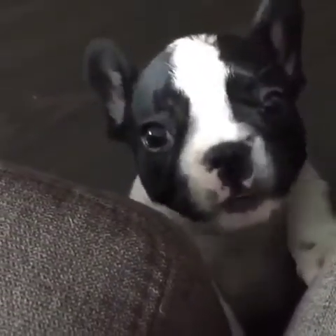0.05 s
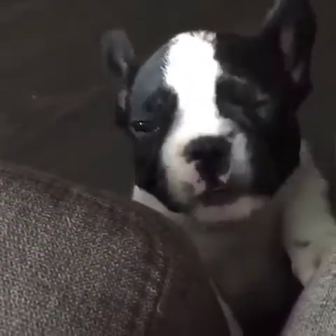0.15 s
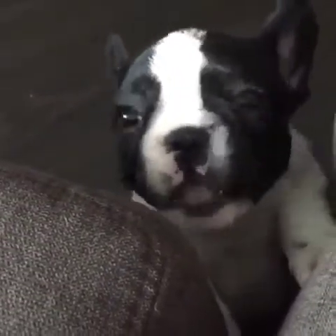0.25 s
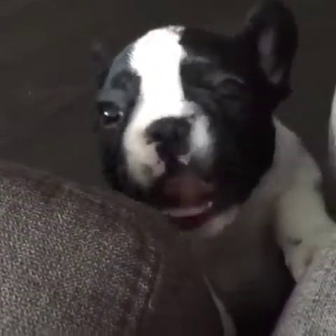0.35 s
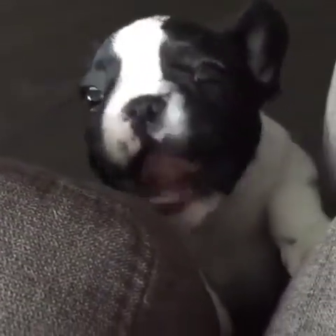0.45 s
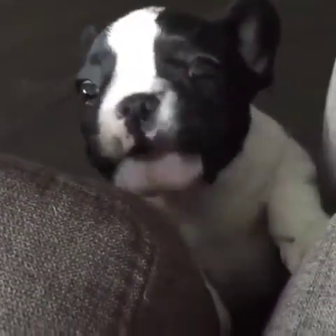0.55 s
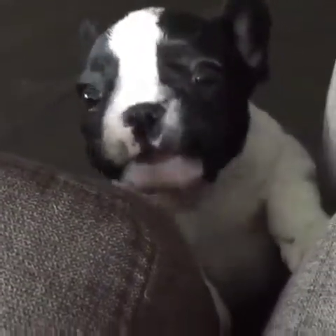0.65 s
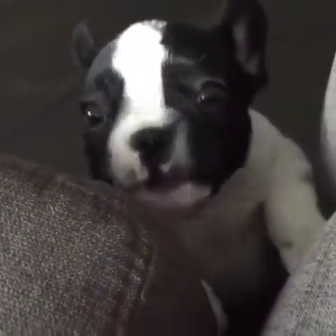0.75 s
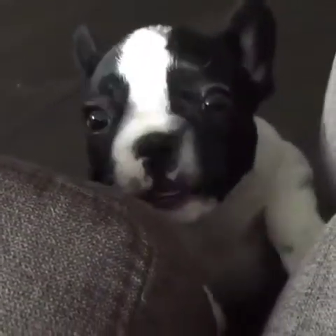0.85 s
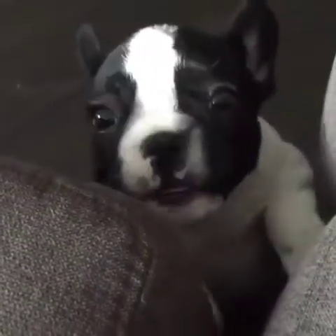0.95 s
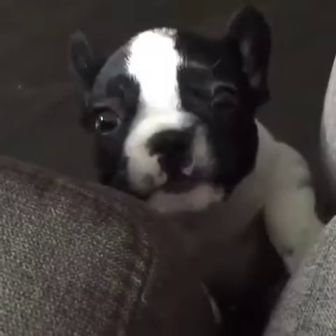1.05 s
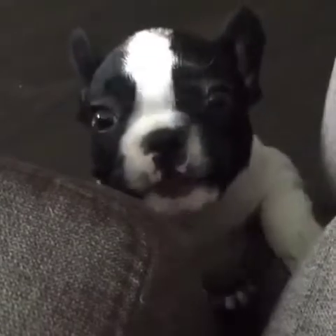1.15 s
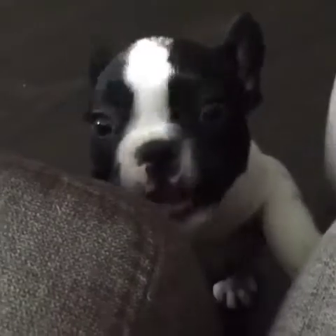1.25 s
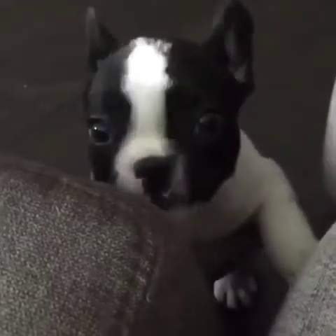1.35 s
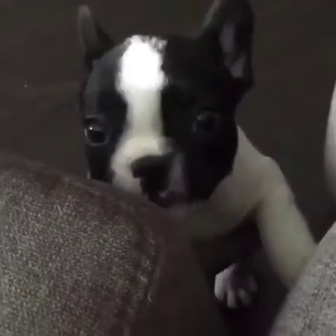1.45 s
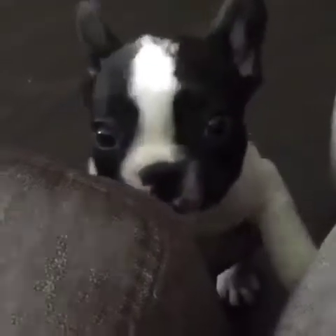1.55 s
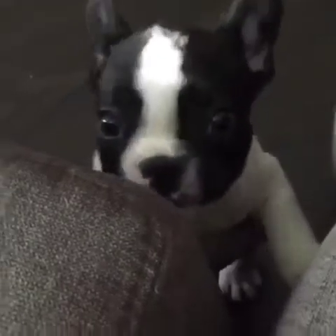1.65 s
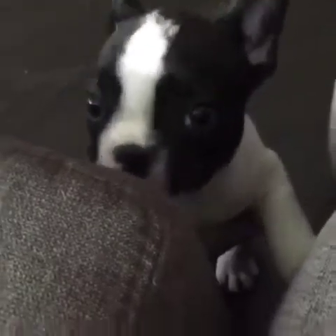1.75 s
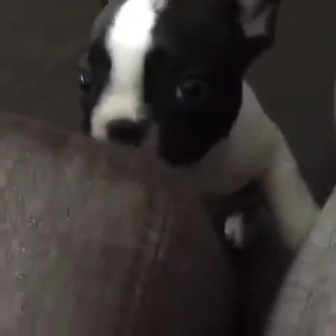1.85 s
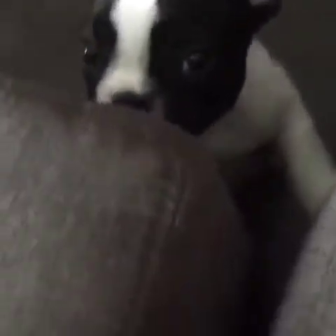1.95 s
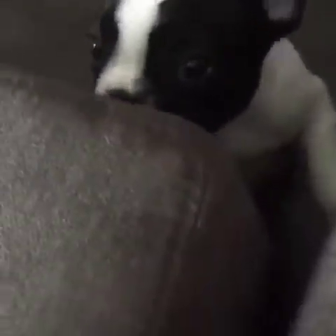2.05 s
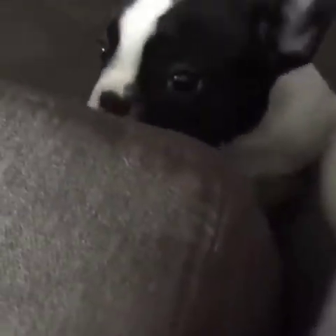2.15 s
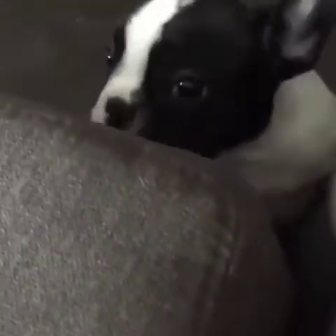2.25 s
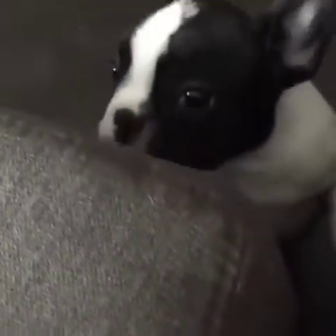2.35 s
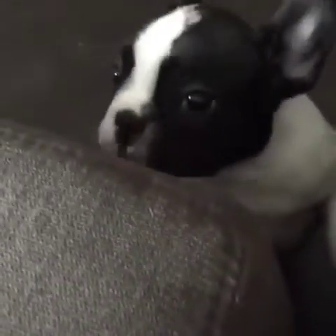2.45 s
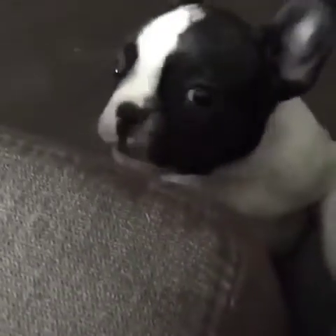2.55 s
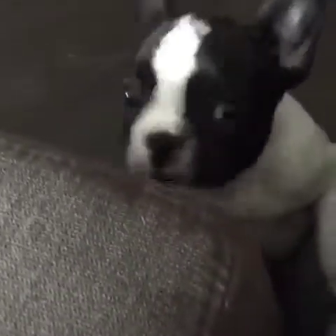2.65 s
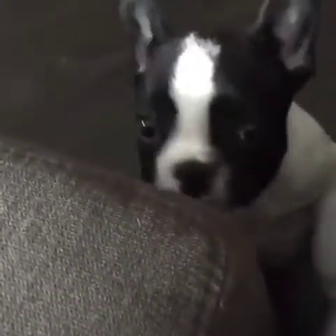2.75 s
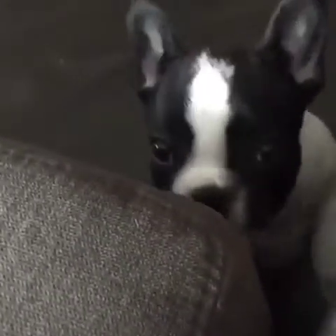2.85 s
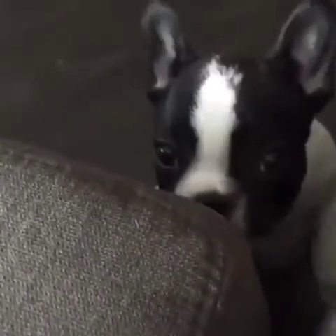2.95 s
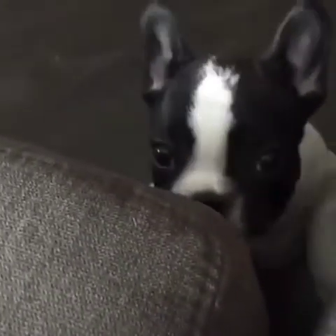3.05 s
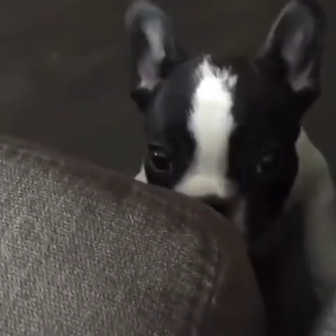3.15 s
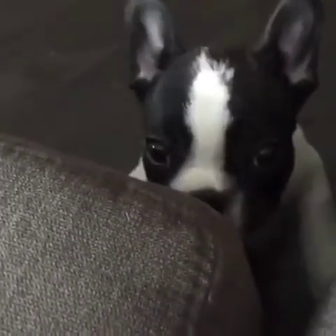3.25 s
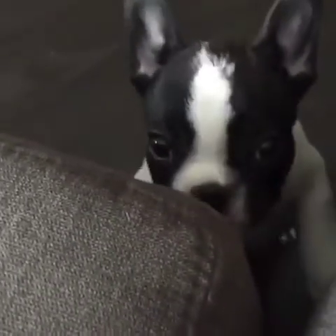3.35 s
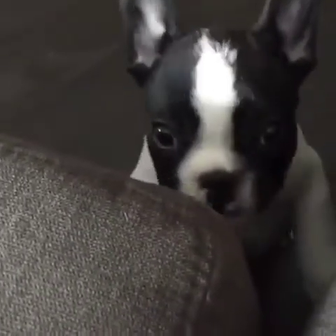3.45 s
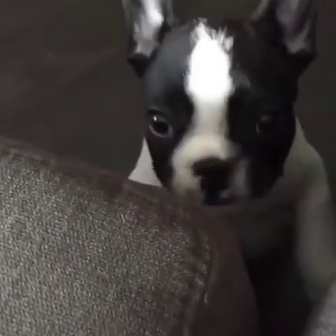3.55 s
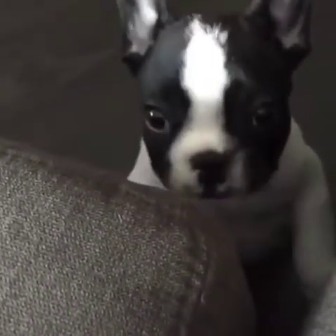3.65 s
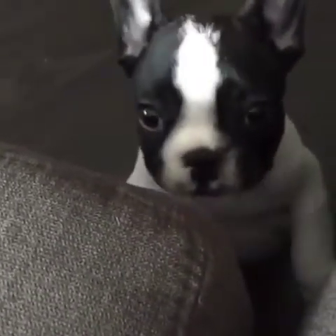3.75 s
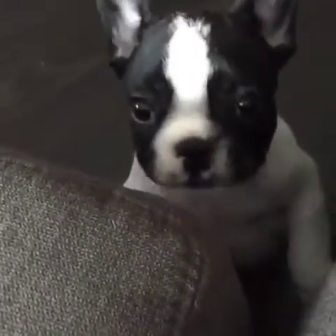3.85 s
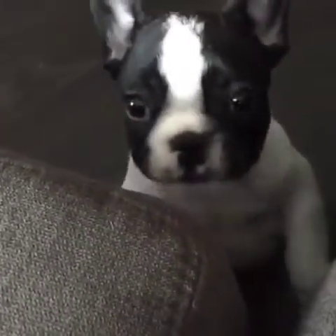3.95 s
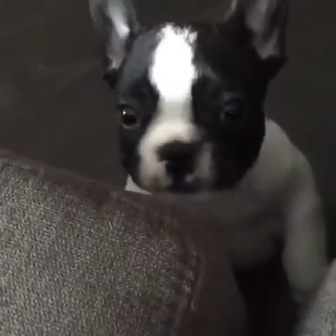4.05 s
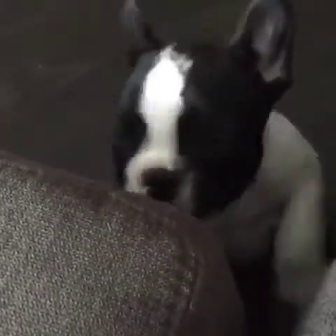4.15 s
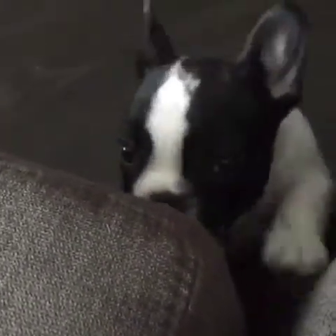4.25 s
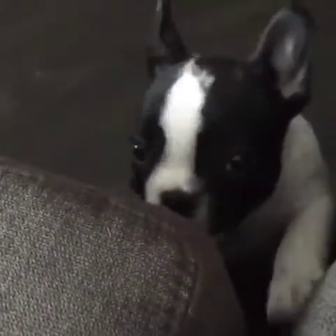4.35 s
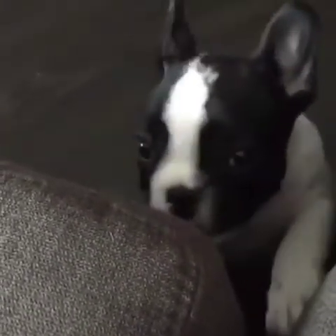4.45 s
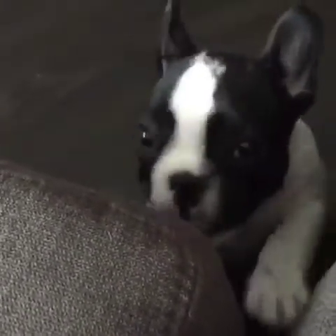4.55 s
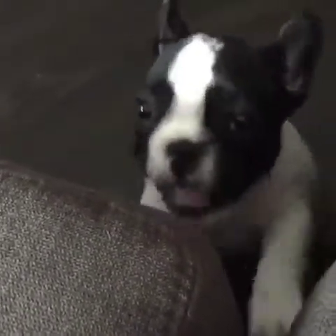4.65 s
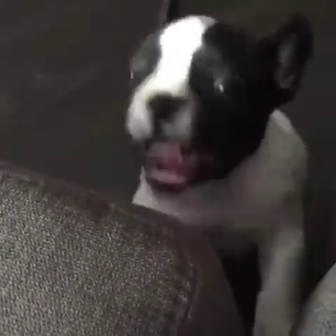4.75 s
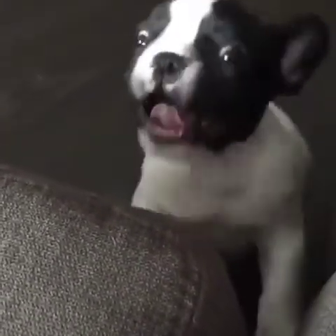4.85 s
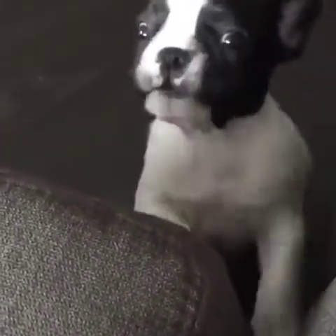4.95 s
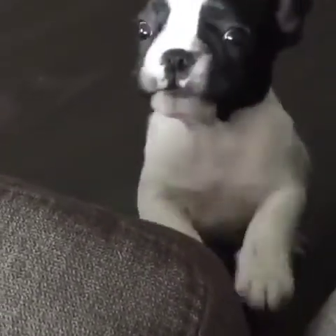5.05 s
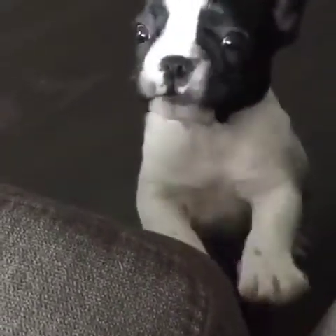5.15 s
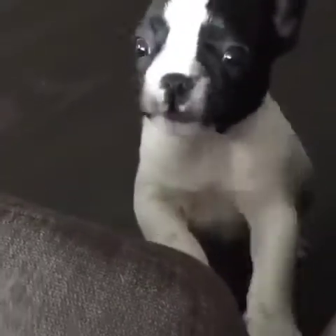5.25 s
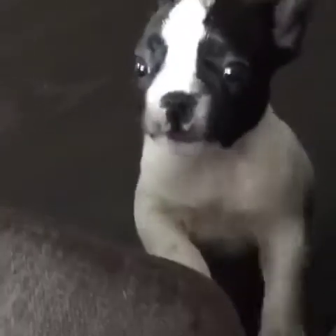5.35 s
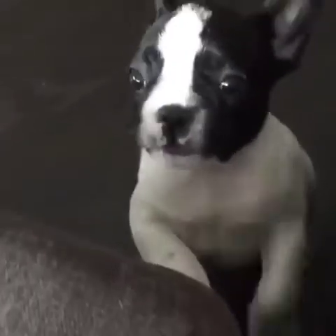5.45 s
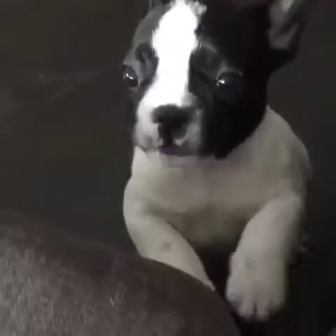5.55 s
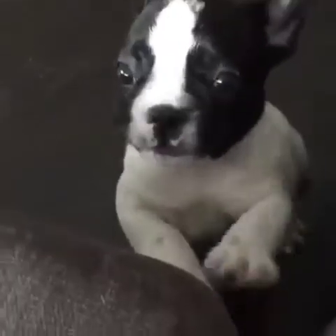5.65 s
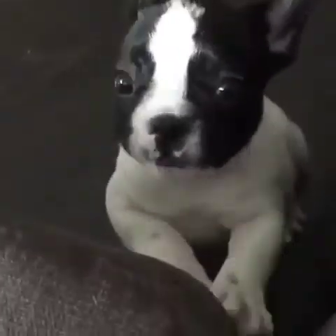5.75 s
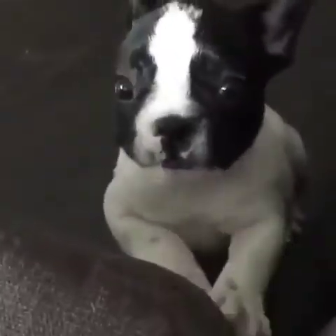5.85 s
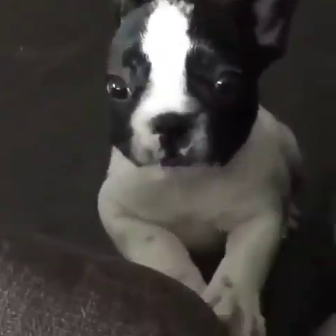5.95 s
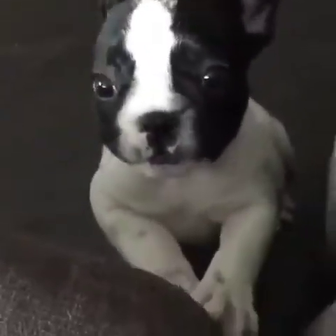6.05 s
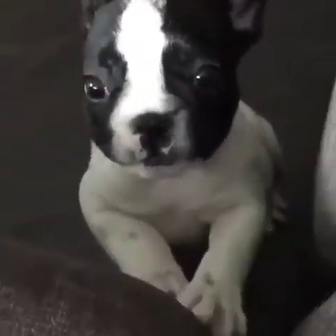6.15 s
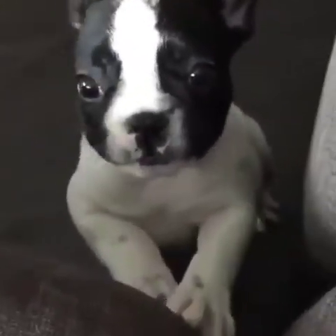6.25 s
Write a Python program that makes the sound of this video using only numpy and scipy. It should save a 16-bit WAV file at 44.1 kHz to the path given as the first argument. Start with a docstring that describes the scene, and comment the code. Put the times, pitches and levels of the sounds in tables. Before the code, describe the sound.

A young puppy very close to a phone microphone gives seven short calls in a furnished room. Two loud, shrill, wavering yelps come first, then two lower, gravelly whimpers and a nasal puff. After a pause of about a second and a half, a high squeak breaks into rasp, another bright falling yelp follows, and a hoarse whine ends it. Low rumble and faint hiss lie beneath.

```python
"""A carpeted, furnished room: a puppy close to a phone's microphone whines and yips seven times.
Pulses of its vocal folds pass a moving throat: clear high notes, period-doubled notes and hoarse chaos.
Wavering sines (throat whistles, an earlier call's tail), noise puffs and short lip and tongue smacks join in.
Low thumps of air hit the microphone; the room answers briefly with a decaying noise tail.
Behind it lies shaped noise: a low household rumble and microphone hiss."""
import sys
import numpy as np
from scipy import signal
from scipy.fft import rfft, irfft, next_fast_len
from scipy.io import wavfile
from scipy.ndimage import uniform_filter1d, map_coordinates

SR = 44100
rng = np.random.default_rng(int(sys.argv[2]) if len(sys.argv) > 2 else 0)


def store_wav(level_fs):
    """Save 16-bit WAV to argv[1]."""
    pcm = np.round(np.clip(np.atleast_2d(level_fs), -1, 1) * 32767)
    wavfile.write(sys.argv[1], SR, pcm.T.astype(np.int16))


N = 277389
T = np.arange(N) / SR  # s


def amp(db):
    """Linear gain of a level in dB."""
    return 10 ** (np.asarray(db) / 20)


def unit(x):
    """Scale to an RMS of one."""
    return x / np.sqrt(np.mean(x ** 2) + 1e-20)


def along(points, hz):
    """Interpolate (f/Hz, value) points on a logarithmic frequency axis."""
    f, value = np.transpose(points)
    return np.interp(np.log(hz + 1), np.log(f + 1), value)


def filtered(x, response):
    """Multiply the spectrum of x by a response of frequency."""
    m = next_fast_len(N + SR // 2)
    return irfft(rfft(x, m) * response(np.fft.rfftfreq(m, 1 / SR)), m)[:N]


def causal(points):
    """Minimum-phase impulse response of a (f/Hz, level/dB) colour, by folding its cepstrum."""
    log_gain = np.log(amp(along(points, np.fft.rfftfreq(4096, 1 / SR))))
    cepstrum = irfft(log_gain)
    cepstrum[1:2048] *= 2
    cepstrum[2049:] = 0
    return irfft(np.exp(rfft(cepstrum)))


def wobble(rate):
    """A smooth random curve with rate knots a second."""
    knots = rng.standard_normal(int(N * rate / SR) + 4)
    return map_coordinates(knots, [T * rate])


def level(s, db):
    """Gain along dB points, silent outside them."""
    return amp(np.interp(T, s, db, left=-140, right=-140))


# rumble of the house and hiss of the microphone: f/Hz, relative level/dB per Hz
HOUSE_COLOUR = [(15, -61.5), (25, -8.5), (96, -2.5), (151, -7.5), (182, -5.5), (244, -18), (286, -22.5),
                (554, -37), (781, -32), (1160, -38.5), (1820, -37), (2140, -39), (3100, -39.5),
                (4030, -41.5), (14000, -50.5)]
FLOOR_DB = -54  # RMS level about which the noise drifts


def floor():
    """White noise coloured as low house rumble over hiss, its level drifting slightly."""
    noise = filtered(rng.standard_normal(N), lambda hz: amp(along(HOUSE_COLOUR, hz)))
    return amp(FLOOR_DB + .8 * wobble(5)) * unit(noise)


# how long the carpeted, furnished room rings: f/Hz, time to fall by 60 dB/s
ROOM_DECAY = [(300, 0.35), (900, 0.49), (2200, 0.55), (12000, 0.82)]


def room(x):
    """A noise tail in which each frequency dies at its own speed answers the sound."""
    hz, t, noise = signal.stft(rng.standard_normal(SR // 2), SR, nperseg=256)
    decay = amp(-60 * t / along(ROOM_DECAY, hz)[:, None])
    tail = signal.istft(noise * decay, SR, nperseg=256)[1]
    delayed = np.pad(x, (300, 0))  # about 7 ms
    return signal.fftconvolve(delayed, tail / np.linalg.norm(tail))[:N]


def ring(out, s, db, hz, t60):
    """Add a sine that starts at db and dies exponentially, for at most 50 ms."""
    t = np.arange(SR // 20) / SR
    out[round(s * SR):][:len(t)] += amp(db - 60 * t / t60) * np.sin(2 * np.pi * hz * t)


# air striking the microphone: t/s, starting level/dB
MIC_THUMPS = [(0.559, -42.5), (1.324, -45.5), (1.458, -48), (1.949, -57), (5.974, -56)]
THUMP_HZ, THUMP_T60_S = 330, .04


def thumps():
    """Air on the microphone gives a short low ring."""
    out = np.zeros(N + SR)
    for s, db in MIC_THUMPS:
        ring(out, s, db, THUMP_HZ, THUMP_T60_S)
    return out[:N]


# lips and tongue: t/s, starting level/dB, f/Hz
MOUTH_SMACKS = [(0.109, -38.5, 1370), (1.618, -42, 740), (2.767, -48.5, 770), (5.454, -48, 1500)]
SMACK_T60_S = .023


def smacks():
    """Each smack rings a few cycles of the mouth cavity."""
    out = np.zeros(N + SR)
    for s, db, hz in MOUTH_SMACKS:
        ring(out, s, db, hz, SMACK_T60_S)
    return out[:N]


# colour of air through nose and mouth: f/Hz, relative level/dB
BREATH_COLOUR = [(500, -23), (900, 4), (2000, 6), (3300, 1), (9000, -3), (14000, -17)]
# breath after calls: crest t/s, crest level/dB (RMS, before flutter), fall/dB per s
BREATHS = [(2.57, -46.5, 169.5), (2.83, -65.5, 55), (6.018, -56, 231)]
PUFF_RISE_S = 0.031


def puffs():
    """Turbulent air through nose and mouth: soft noise, slightly fluttering."""
    air = unit(filtered(rng.standard_normal(N), lambda hz: amp(along(BREATH_COLOUR, hz))))
    gain = np.zeros(N)
    for s, db, fall in BREATHS:
        gain += level([s - PUFF_RISE_S, s, s + .3], [db - 12, db, db - .3 * fall])
    return air * amp(1.8 * wobble(40)) * gain


# the throat resonance whistling by itself, mostly in hoarse stretches;
# the first two rows are the fading tail of an earlier call:
# start t/s, end t/s, first f/Hz, last f/Hz, first level/dB, last level/dB (RMS, before flutter)
WHISTLES_AND_TAIL = [(0, 0.134, 938, 910, -55.5, -69), (0, 0.122, 2087, 2170, -59.5, -68),
                     (.16, 0.312, 2186, 2510, -32, -28), (.44, 0.519, 2256, 2290, -34, -30),
                     (.535, 0.587, 2665, 2650, -22, -22), (.945, 1.042, 2076, 2280, -31, -19.5),
                     (1.06, 1.166, 2353, 2200, -36, -45.5), (2.21, 2.299, 2038, 2184, -38, -41),
                     (2.3, 2.428, 2118, 2150, -34.5, -44), (4.267, 4.443, 2038, 2400, -36.5, -40),
                     (4.69, 4.749, 2370, 2660, -37, -31), (4.95, 5.029, 2486, 2340, -40.5, -33.5),
                     (5.5, 5.588, 2090, 1873, -54, -39), (5.62, 5.681, 2212, 2070, -40, -46),
                     (5.69, 5.739, 2100, 2280, -42, -38)]


def whistles_and_tail():
    """Throat whistles and a call's last two partials as sines with trembling pitch and fluttering strength."""
    out = np.zeros(N)
    for row in WHISTLES_AND_TAIL:
        shake = 1 + .018 * wobble(70) + .02 * wobble(300)
        hz = np.interp(T, row[:2], row[2:4]) * shake
        tone = np.sqrt(2) * np.sin(2 * np.pi * np.cumsum(hz) / SR)
        gain = uniform_filter1d(level(row[:2], row[4:]), size=600)
        out += tone * amp(3.5 * wobble(150)) * gain
    return out


# ways the folds close: (hoarseness 0-1, every second pulse weaker 0-1), before their random wander
CLEAR, SOFT, HUSKY, ROUGH, RASPY = (.035, .02), (.075, .06), (.14, .03), (.29, .1), (.46, .3)
SPLIT, GRUFF, HOARSE, TORN = (.23, .66), (.36, .75), (.68, .45), (.9, .3)
# a note lasts until the next or its call's end: t/s, first f/Hz, last f/Hz, tremor/%, way of closing
FOLD_NOTES = [ (.128, 1418, 1482, 0, HOARSE), (.193, 1533, 1500, 0, SPLIT),
              (.218, 1498, 1453, -0.5, HOARSE), (.285, 1423, 1234, 1, ROUGH),
              (.308, 1446, 1671, 8.5, HUSKY), (.372, 1689, 1854, 8, ROUGH), (.407, 1771, 1671, 2.5, HUSKY),
              (.471, 1204, 1208, 0, HUSKY), (.489, 1736, 1723, 2.5, HUSKY), (.533, 1555, 1537, -0.5, ROUGH),
              (.59, 1578, 1706, 0, HUSKY), (.612, 1678, 1391, -1.5, HUSKY), (.642, 1115, 1098, 0.5, HUSKY),
              (.669, 1497, 1458, -1.5, HUSKY), (.718, 1128, 1121, 3.5, HUSKY), (.92, 1438, 1461, 0, HOARSE),
              (.99, 1490, 1498, -1.5, SPLIT), (1.035, 1453, 1490, 9, ROUGH),
              (1.065, 1515, 1532, 7.5, GRUFF), (1.084, 1515, 1549, 7, ROUGH),
              (1.153, 1507, 1470, 4.5, CLEAR), (1.259, 1484, 1468, 2, CLEAR),
              (1.372, 1490, 1346, 0.5, CLEAR), (1.403, 1331, 1104, 0, CLEAR), (1.422, 1081, 1055, 2, HUSKY),
              (1.636, 753.2, 705.7, -1, TORN), (1.722, 718.8, 962, 0, HUSKY), (1.76, 967, 922, -1, HUSKY),
              (1.815, 878, 761.4, 0, TORN), (1.898, 789, 841, -1.5, GRUFF), (1.948, 778, 1114, -0.5, ROUGH),
              (2.188, 759.6, 849.4, 0, TORN), (2.285, 1252, 1395, 0.5, RASPY),
              (2.31, 1395, 1253, -1, RASPY), (2.355, 791.3, 720.9, 1, RASPY), (2.42, 852, 900.3, 1, SPLIT),
              (2.461, 898.7, 880.2, 0, SPLIT), (2.512, 682.5, 1008, 1.5, HUSKY),
              (2.55, 1017, 900.2, 1, ROUGH), (4.171, 2037, 1985, 5.5, CLEAR), (4.215, 1921, 2159, 0, CLEAR),
              (4.248, 2174, 1990, 2, CLEAR), (4.267, 741.4, 719.6, -1.5, RASPY),
              (4.31, 709, 716.9, 0.5, HOARSE), (4.379, 748, 851, -1, HUSKY),
              (4.428, 846.6, 760.3, 0.5, HOARSE), (4.64, 930, 1025, -1.5, RASPY),
              (4.658, 1021, 1131, -0.5, HUSKY), (4.674, 1120, 1506, 0, ROUGH),
              (4.692, 1599, 1775, 1, RASPY), (4.712, 1780, 1417, 0, RASPY),
              (4.735, 1329, 1673, -0.5, HUSKY), (4.778, 1657, 1477, 0, HOARSE),
              (4.803, 1493, 1563, 0, CLEAR), (4.897, 1536, 1524, 0.5, CLEAR),
              (4.947, 1580, 1647, 1, HOARSE), (5.002, 1649, 1207, -0.5, HOARSE),
              (5.03, 1141, 1059, 1, CLEAR), (5.11, 1072, 1000, 1, CLEAR), (5.17, 971.4, 888.6, 1.5, CLEAR),
              (5.238, 894.3, 991.2, 3.5, ROUGH), (5.466, 747.7, 788, 0, TORN),
              (5.545, 799.6, 766.5, 6, GRUFF), (5.644, 703, 684.4, -0.5, GRUFF),
              (5.7, 693.7, 766, -1, GRUFF), (5.735, 848, 831, -0.5, HUSKY), (5.81, 902.6, 921, 3, SOFT),
              (5.91, 908.6, 850, 1.5, SOFT), (5.976, 864, 962, -5, ROUGH)]
# tremor of the breath, each row taking over 0.1 s before its crest: crest t/s, rate f/Hz
BREATH_TREMOR = [(0.334, 16), (1.068, 16.9), (4.17, 37), (5.62, 19)]
JUMP_S = .003  # time a jump between notes takes


def melody():
    """Pitch, hoarseness and doubling: each note glides evenly, shaken by the breath's tremor."""
    rows = [(*row[:4], *row[4]) for row in FOLD_NOTES]
    start, first, last, depth, hoarse, doubled = np.transpose(rows)
    stops = np.array([call[-1][0] for call in CALL_EFFORT])
    call_end = stops[np.searchsorted(stops[:-1], start)]
    end = np.minimum(np.append(start[1:], T[-1]), call_end)
    note = np.maximum(np.searchsorted(start, T) - 1, 0)
    progress = np.clip((T - start[note]) / (end - start)[note], 0, 1)
    glide = first[note] + (last - first)[note] * progress
    crest, rate = np.transpose(BREATH_TREMOR)
    j = np.maximum(np.searchsorted(crest - .1, T) - 1, 0)
    tremor = np.cos(2 * np.pi * rate[j] * (T - crest[j]))
    hz = glide * (1 + depth[note] / 100 * tremor)
    return uniform_filter1d(hz, size=max(round(JUMP_S * SR), 1)), hoarse[note], doubled[note]


def folds():
    """One pulse per fold closure; hoarseness scatters timing and size and adds air noise."""
    hz, hoarse, doubled = melody()
    hoarse = uniform_filter1d(hoarse, size=250) * amp(2.5 * wobble(45))  # the rasp comes and goes
    doubled = doubled * np.clip(1 + .9 * hoarse * wobble(60), -1, 1.1)
    drift = .003 * wobble(120) + .06 * hoarse * wobble(60)
    chaos = hoarse ** 2 * (.22 * wobble(35) + .1 * wobble(300))
    cycles = np.cumsum(hz * (1 + drift + chaos)) / SR

    # when each fold closure falls, in samples, and how strong it is
    number = np.arange(1, int(cycles[-1]))
    at = np.interp(number, cycles, np.arange(N))
    i = at.astype(int)
    h, d = hoarse[i], doubled[i]
    chance = rng.standard_normal((len(at), 2))
    at = np.clip(at + .13 * h * chance[:, 0] * SR / hz[i], 9, N - 10)
    i = at.astype(int)
    scatter_db = np.minimum(h, .55) * (6 * chance[:, 1] + 2 * wobble(150)[i])
    size = (1 + d * (-1.) ** number) * amp(scatter_db)

    # place each pulse between samples as a windowed sinc
    taps = np.floor(at)[:, None] + np.arange(-7, 9)
    u = taps - at[:, None]
    shape = np.sinc(.8 * u) * np.cos(np.pi * u / 17) ** 2
    pulses = np.bincount(taps.astype(int).ravel(), (size[:, None] * shape).ravel(), N)

    # the air noise swells and ebbs with every cycle
    air = rng.standard_normal(N) * np.sqrt(hz / SR) * (1 + .6 * np.cos(2 * np.pi * cycles))
    air = filtered(air, lambda f: np.clip(f / 6000, .22, 1))  # turbulence is strongest in the treble
    return pulses + (.04 + 1.1 * hoarse) * air


ATTACK_S, ATTACK_DB, RELEASE_S, RELEASE_DB = .004, 15.5, 0.0089, 24.5


def sung(call, db):
    """Gain of one call, which rises out of silence and sinks back into it."""
    s = call[:, 0]
    times = np.r_[s[0] - ATTACK_S, s, s[-1] + RELEASE_S]
    return level(times, np.r_[db[0] - ATTACK_DB, db, db[-1] - RELEASE_DB])


# throat colour with the mouth nearly shut: f/Hz, relative level/dB
SHUT_MOUTH = [(250, -22.5), (400, -18.5), (550, -13.5), (850, -3), (1200, -8.5), (1600, -12.5),
              (2100, -7.5), (2600, -21.5), (3300, -31.5), (3900, -15), (4800, -16), (7000, -26.5),
              (9000, -28.5), (11500, -37), (14000, -31)]
# throat colour with the mouth half open: f/Hz, relative level/dB
HALF_OPEN_MOUTH = [(300, -30.5), (550, -20), (780, -12.5), (1100, -15), (1500, -8.5), (1900, -7),
                   (2250, -0.5), (2700, -13), (3300, -34), (3900, -21.5), (4800, -22.5), (7000, -19.5),
                   (11000, -28), (14000, -27)]
# throat colour with the mouth wide open: f/Hz, relative level/dB
WIDE_MOUTH = [(500, -29.5), (1100, -11.5), (1700, -5.5), (2600, 1), (3500, -8.5), (5000, -5.5),
              (6500, -18.5), (9000, -22.5), (11500, -34.5), (14000, -27)]
# one curve per call: t/s, level/dB below the throat notch (before the lock swell),
# treble above the notch/dB relative to that level (before the hollow), mouth opening 0-1
CALL_EFFORT = [
    [(.131, -41.5, -9.5, 0.3), (.2, -29, -7.5, 0.26), (.28, -32.5, -4.5, 0.3), (.34, -28, -3, .6),
     (.4, -22, -12, .7), (.43, -29.5, 0, .75), (.465, -28, 0.5, 0.5), (.476, -20.5, -13.5, .8),
     (.492, -28.5, 1.5, .85), (.52, -31, 10.5, 1), (.565, -17.5, -2, .95), (.62, -34.5, 1, 0.6),
     (.66, -24, -13, 0.7), (.71, -38, -5, 0.2), (.733, -40, -20.5, 0)],
    [(.928, -34, -16, 0.09), (1.0, -29, -6.5, 0.5), (1.035, -30, -10, .25), (1.052, -38, 0, .3),
     (1.068, -28, -11, .3), (1.1, -29, -8, 0.5), (1.185, -31.5, -2.5, 0.33), (1.245, -29.5, -5, 0.6),
     (1.33, -29, -6, 0.6), (1.39, -28, -9.5, .5), (1.445, -28.5, -19, .2)],
    [(1.64, -45, -18, 0.03), (1.71, -37.5, -10, 0.05), (1.74, -31.5, -25.5, .05), (1.8, -34.5, -23, .05),
     (1.85, -37, -16, 0), (1.9, -36, -16, 0), (1.945, -33, -16, 0), (1.968, -35.5, -19.5, .05)],
    [(2.192, -46.5, -15, 0.1), (2.21, -38, -14, 0.2), (2.27, -42.5, -8, .2), (2.3, -35, -10, 0.1),
     (2.36, -39, -12, .1), (2.44, -35, -13.5, 0.1), (2.505, -37.5, -14, .1), (2.55, -34, -18, .05),
     (2.568, -45.5, 2, .05)],
    [(4.174, -36, -6.5, .6), (4.21, -33.5, -14.5, 0.7), (4.264, -36, -12, 0.4), (4.29, -37, -3.5, 0.2),
     (4.34, -42, -6.5, 0.3), (4.39, -35, -8, 0.2), (4.443, -33.5, -15.5, 0.6)],
    [(4.643, -38.5, -8.5, 0.4), (4.672, -29.5, -11.5, 0.7), (4.69, -32, -9, .6), (4.72, -32, -6, .6),
     (4.745, -28, -12, 0.54), (4.77, -33.5, -6, .6), (4.81, -32.5, -4.5, .6), (4.895, -34, -2, .6),
     (4.96, -35, -1.5, .6), (5.02, -34, -6, 0.55), (5.07, -31, -9.5, 0.7), (5.16, -34, -11.5, .35),
     (5.25, -35, -14.5, .05)],
    [(5.47, -44.5, -11.5, 0.3), (5.55, -39, -7, .27), (5.6, -36.5, -8, .2), (5.72, -40, -7, 0),
     (5.75, -33, -21, .1), (5.82, -32, -9.5, .1), (5.88, -35.5, -12.5, .05), (5.94, -30.5, -9, 0.11),
     (5.988, -33, -16.5, 0)],
]
NOTCH_HZ = 3300
# the voice swells below the notch while its second partial sits on the throat resonance
LOCK_HZ, LOCK_WIDTH_HZ, LOCK_DB = 2400, 260, 5.5
GAP_HZ, GAP_WIDTH_HZ, GAP_DB = 3330, 170, -9  # the hollow in the throat's colour


def steady(x):
    """Even out the level over about 40 ms; a partial that meets a resonance still swells."""
    return x / np.sqrt(np.abs(uniform_filter1d(x ** 2, size=1800)) + 1e-12)


def puppy():
    """The pulses pass a throat that moves between shut and open; effort sets level and treble."""
    source = folds()
    s, _, _, mouth = np.vstack(CALL_EFFORT).T
    opening = np.clip(np.interp(T, s, mouth), 0, 1)
    voice = np.zeros(N)
    for centre, colour in [(0, SHUT_MOUTH), (.5, HALF_OPEN_MOUTH), (1, WIDE_MOUTH)]:
        share = np.clip(1 - 2 * np.abs(opening - centre), 0, 1)
        voice += share * signal.fftconvolve(source, causal(colour))[:N]
    treble = filtered(voice, lambda hz: hz > NOTCH_HZ)
    # the throat spreads each pulse a little; the mouth spreads its treble over about 2 ms
    body = filtered(voice - treble, lambda hz: np.exp(.9j * np.sin(hz / 260)))
    treble = filtered(treble, lambda hz: np.exp(1.6j * (np.sin(hz / 430) + np.sin(hz / 170))))

    calls = [np.array(rows) for rows in CALL_EFFORT]
    body_gain = sum(sung(c, c[:, 1]) for c in calls)
    treble_gain = sum(sung(c, c[:, 1] + c[:, 2]) for c in calls)
    second_partial = 2 * melody()[0]
    lock = amp(LOCK_DB * np.exp(-((second_partial - LOCK_HZ) / LOCK_WIDTH_HZ) ** 2))
    whole = lock * body_gain * steady(body) + treble_gain * steady(treble)
    return filtered(whole, lambda hz: amp(GAP_DB * np.exp(-((hz - GAP_HZ) / GAP_WIDTH_HZ) ** 2)))


def scene():
    """The close puppy and the thumps, their answer from the room, and the floor noise."""
    near = thumps() + smacks() + puffs() + whistles_and_tail() + puppy()
    return (floor() + amp(-14.5) * room(near) + near)[None]


TOP_HZ = 14100  # the phone's band limit


def record(dry):
    """The phone keeps neither the deepest bass nor anything above its band limit."""
    return filtered(dry[0], lambda hz: (hz < TOP_HZ) * hz ** 2 / (hz ** 2 + 30 ** 2))[None]


dry = scene()
out = record(dry)
store_wav(out)
```